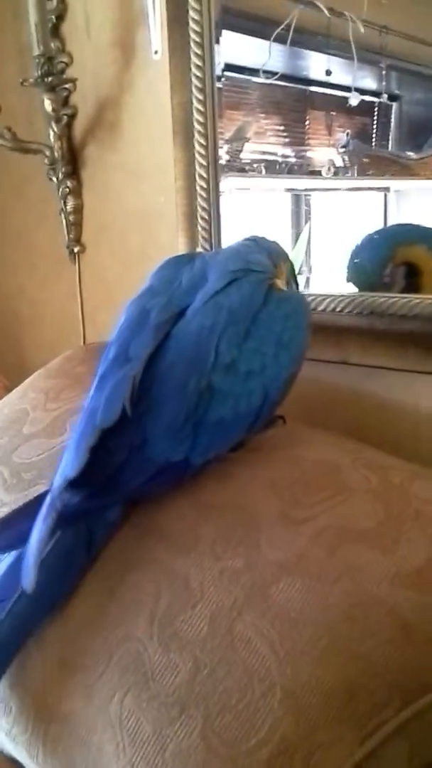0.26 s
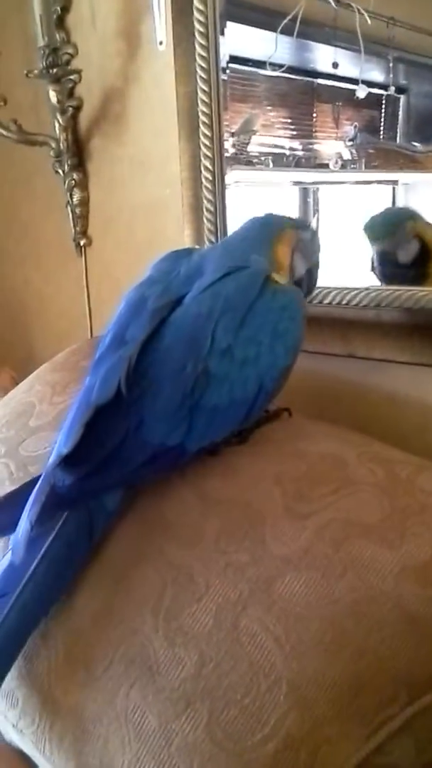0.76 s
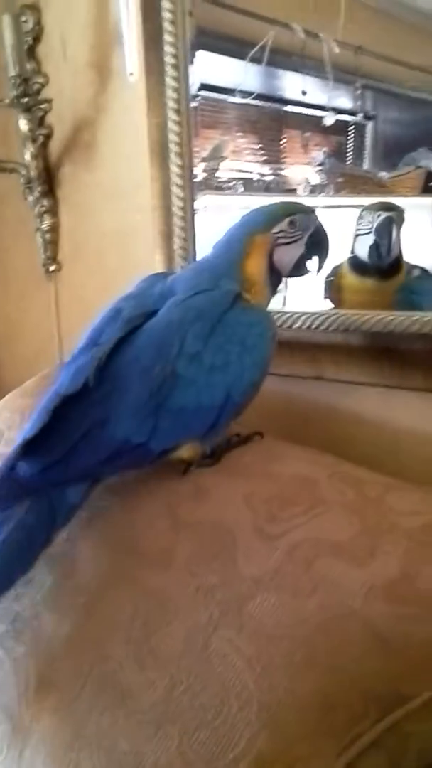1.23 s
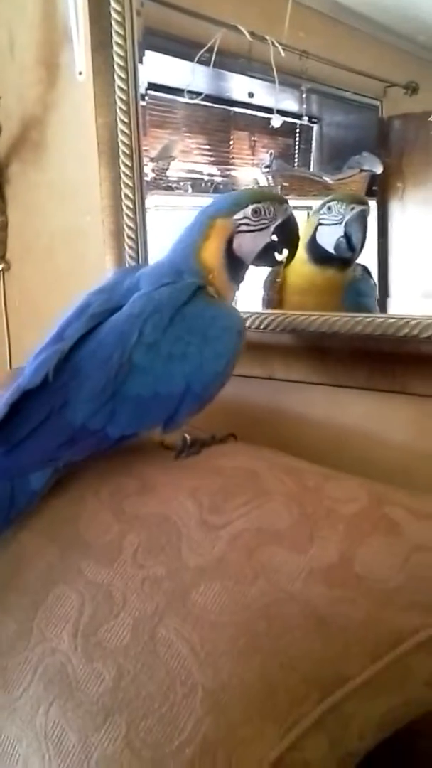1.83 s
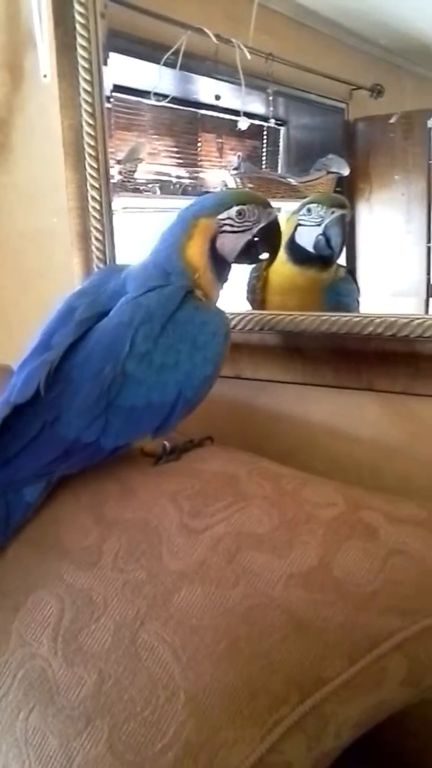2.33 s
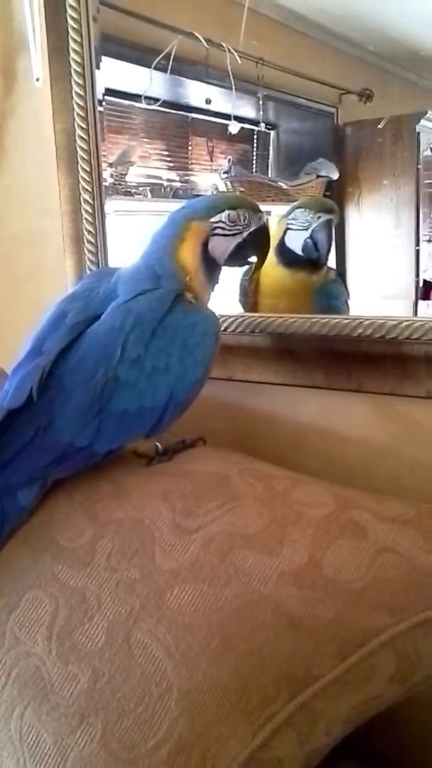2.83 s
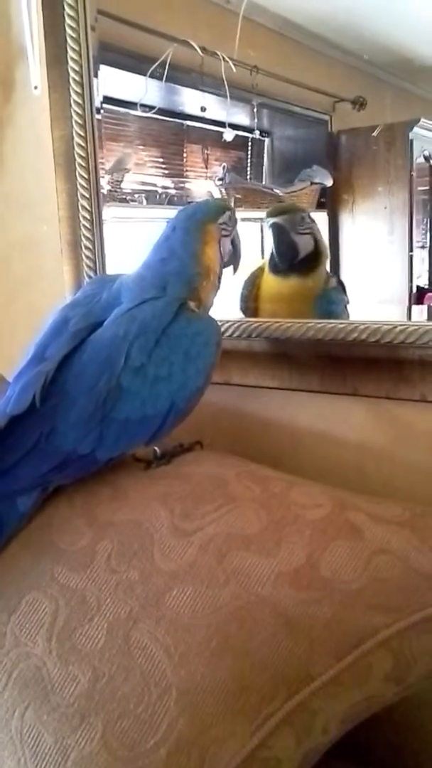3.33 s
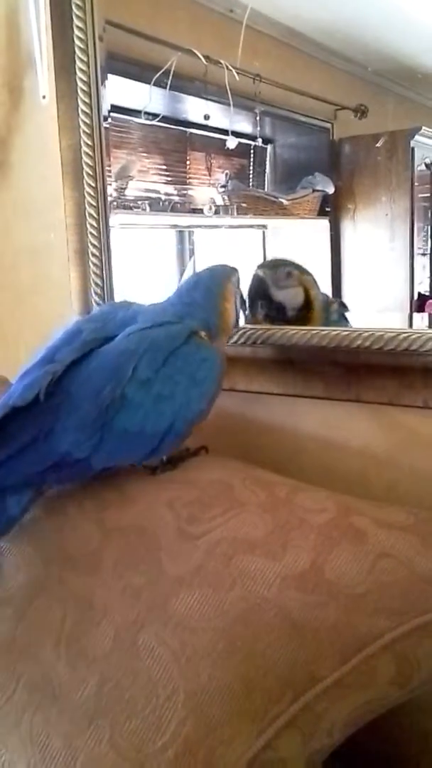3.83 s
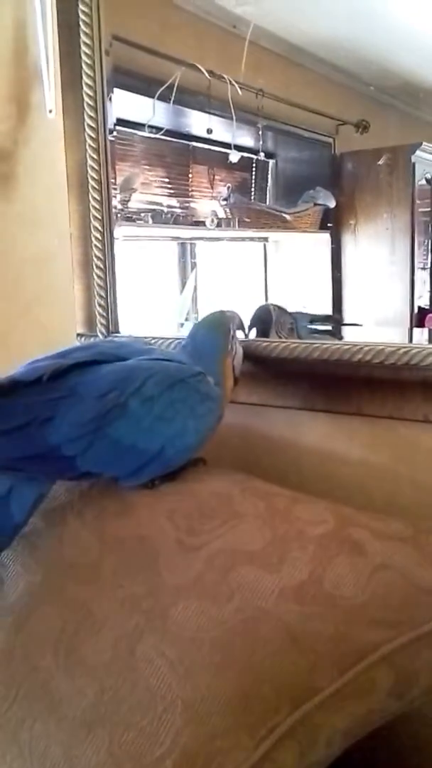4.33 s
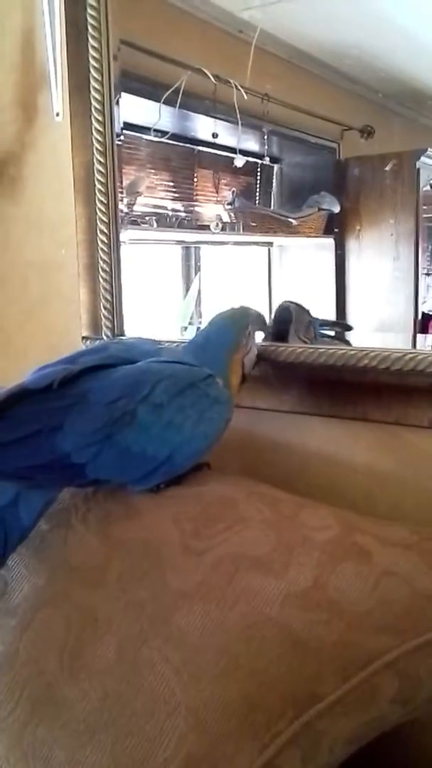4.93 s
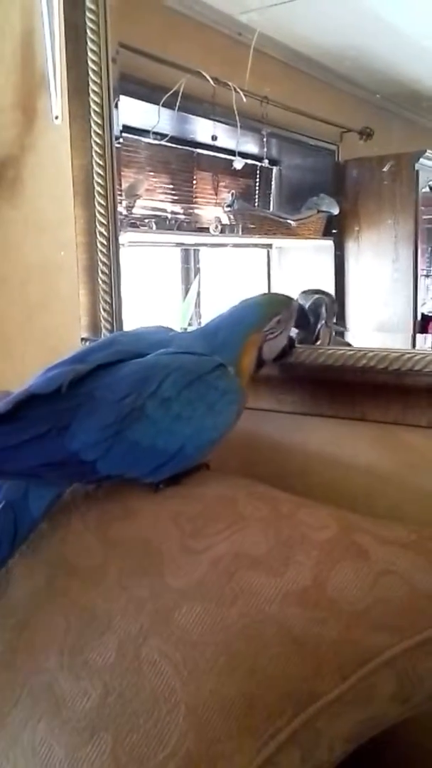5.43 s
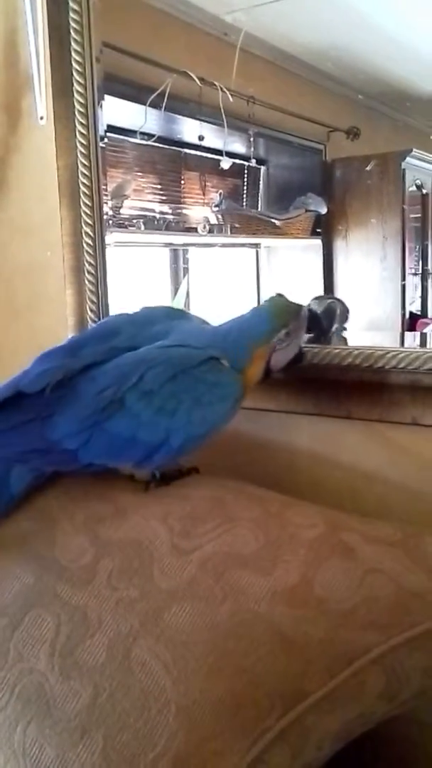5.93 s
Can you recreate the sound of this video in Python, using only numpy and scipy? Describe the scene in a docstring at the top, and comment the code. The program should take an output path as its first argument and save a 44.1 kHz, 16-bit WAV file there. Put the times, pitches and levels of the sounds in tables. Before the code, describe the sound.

Close thuds, tiny creaks and brief buzzes from a handled phone over faint hiss, followed by a parrot's irregular gritty beak taps on glass.

```python
"""Faint hum and hiss of a small room, a thin whistle at the start and faint rustling; then soft bumps,
creaks and deep dry knocks on a phone case, some followed by a buzz; later a macaw clicks and taps a mirror.
Knocks and bumps drive decaying sine modes; ticks, buzzes, creaks and taps are enveloped coloured noise;
grip rumble and rustle are resonant noise, the whistle is a gliding sine, the hum a sine plus narrow noise."""
import sys
import numpy as np
from scipy import signal
from scipy.fft import rfft, irfft
from scipy.io import wavfile
from scipy.ndimage import uniform_filter1d

SR = 44100
rng = np.random.default_rng(int(sys.argv[2]) if len(sys.argv) > 2 else 0)


def wav_out(sig):
    """Save sig, one row per channel (or a flat mono array), as 16-bit PCM at SR to the path in sys.argv[1]."""
    wavfile.write(sys.argv[1], SR, np.round(np.clip(np.atleast_2d(sig).T, -1, 1) * 32767).astype(np.int16))


N = 271656
T = np.arange(N) / SR

# colour of a dry contact on the case: (frequency [Hz], level [dB])
CONTACT_COLOUR = [(500, 13), (1800, 8.5), (2900, -3), (3800, 5.5), (5000, -0.5), (6500, -6), (9000, -3.5),
                  (12000, -15), (14500, -0.5)]


def undb(db):
    """Decibels to gain."""
    return 10 ** (np.asarray(db) / 20)


def unit(x):
    """Scale to rms 1."""
    return x / np.sqrt(np.mean(x ** 2))


def curve(rows):
    """Rows of (time [s], value) joined by straight lines."""
    return np.interp(T, *np.transpose(rows))


def add(track, start_s, sound):
    """Mix a sound into a track, cut at the track's end."""
    i = int(round(start_s * SR))
    track[..., i:i + sound.shape[-1]] += sound[..., :max(N - i, 0)]


def highpass(x, order, hz):
    """Butterworth high-pass."""
    return signal.sosfilt(signal.butter(order, hz, "high", fs=SR, output="sos"), x)


def noise(size, colour, tilt_db_per_oct=0, low_hz=1):
    """Noise of rms 1 with a (Hz, dB) colour, a tilt and a bass roll-off below low_hz."""
    hz = np.maximum(np.fft.rfftfreq(size, 1 / SR), 1)
    points_hz, points_db = np.transpose(colour)
    colour_db = np.interp(np.log(hz), np.log(points_hz), points_db)
    gain = undb(colour_db + tilt_db_per_oct * np.log2(hz))
    gain = gain / np.hypot(1, (low_hz / hz) ** 3)
    return unit(irfft(rfft(rng.standard_normal(size)) * gain, size))


def resonate(x, hz, width_hz):
    """A resonance with gain 1 at its centre."""
    return signal.lfilter(*signal.iirpeak(hz, hz / width_hz, fs=SR), x)


def band(size, hz, width_hz):
    """Noise of rms 1 through the same resonance twice."""
    once = resonate(rng.standard_normal(size), hz, width_hz)
    return unit(resonate(once, hz, width_hz))


def fade(t, t60_s):
    """Exponential decay, 60 dB in t60_s."""
    return np.exp(-np.log(1000) * t / t60_s)


def push(t, centre_ms, width_ms):
    """Gaussian pulse of unit sum; width_ms is its standard deviation."""
    force = np.exp(-.5 * ((t * 1000 - centre_ms) / width_ms) ** 2)
    return force / force.sum()


def walk(rate_hz):
    """Smoothed random steps of rms near 1."""
    k = int(SR / rate_hz)
    steps = np.repeat(rng.standard_normal(N // k + 1), k)
    return unit(uniform_filter1d(steps, k))[:N]


def swells(rows):
    """Power-summed bell gains from (middle [s], length at half height [s], level [dB])."""
    power = 0
    for middle_s, length_s, db in rows:
        bell = .5 ** ((2 * (T - middle_s) / length_s) ** 2)
        power = power + (undb(db) * bell) ** 2
    return np.sqrt(power)


def room():
    """Coloured air and microphone hiss, plus an appliance hum: a sine wavering against narrow noise."""
    # hiss level before each side's gain: (time [s], level [dB])
    hiss = [(0.0, -69), (0.38, -70.5), (1.18, -66), (1.99, -72.5), (2.86, -73.5), (4.13, -70), (4.56, -73),
            (5.8, -70), (6.16, -69)]
    # room air at each microphone: (frequency [Hz], level [dB])
    air_left = [(30, 33), (150, 14.5), (300, 12.5), (600, 12), (1500, 5.5), (3000, 2.5), (8000, 0.5),
                (14000, 0.5)]
    air_right = [(30, 5), (70, 19), (140, 18.5), (330, 16.5), (600, 11.5), (1500, 5.5), (3000, 3.5),
                 (8000, 1), (14000, -1)]
    air = np.array([undb(15) * noise(N, air_left), undb(11.5) * noise(N, air_right)])
    hum = undb(-73.5) * band(N, hz=245.1, width_hz=21.6)
    hum += undb(-62.0) * np.sin(2 * np.pi * 246 * T)
    return air * undb(curve(hiss)) + np.outer([undb(-21.0), 1], hum)


def whistle():
    """A thin, fluttering sine whose pitch rises as it swells."""
    # swells: (middle [s], length at half height [s], level [dB])
    whistle_swells = [(0.01, .07, -65), (.29, .15, -66), (.49, .08, -68)]
    rest_hz, rise_hz, flutter_hz = 5430, 370, 55
    level = swells(whistle_swells)
    hz = rest_hz + rise_hz * level / level.max() + flutter_hz * walk(120)
    tone = np.sin(2 * np.pi * np.cumsum(hz) / SR)
    return np.outer([undb(-18), 1], level * undb(4 * walk(40)) * tone)


def grip_rumble():
    """Skin creeps on the case beside the left microphone: low resonant noise, louder as the grip shifts."""
    # grip shifts: (middle [s], length at half height [s], level [dB])
    shifts = [(.585, 0.14, -40), (1.2, 0.97, -46), (3.7, 0.65, -57.5), (6.0, 0.53, -55.5)]
    rest_db = -56
    level = np.hypot(undb(rest_db), swells(shifts)) * undb(2.8 * walk(22))
    rumble = band(N, hz=82.5, width_hz=70) * level
    return np.array([rumble, undb(-29) * rumble])


def feathers():
    """Feathers brush as the bird moves: faint fluttering high noise, mostly on the right."""
    # rustles: (middle [s], length at half height [s], level [dB])
    rustles = [(.36, 0.49, -65), (1.0, 0.87, -67), (1.7, 0.33, -65), (3.47, .08, -67.5),
               (4.28, 0.41, -65.5), (5.0, 0.44, -68), (5.93, 0.55, -68)]
    rest_db = -75.5
    level = np.hypot(undb(rest_db), swells(rustles)) * undb(3.6 * walk(19))
    left, right = [undb(side_db) * band(N, hz=4340, width_hz=1500) for side_db in (-12, 0)]
    return np.array([left, right]) * level


def case_ring(t, hard_db):
    """Impulse response of the case as decaying sine modes; hard_db lifts or cuts the upper ones."""
    # modes: (frequency [Hz], level [dB], t60 [s], polarity [+1 or -1])
    modes = [(81, -12, 0.071, -1), (119.7, 1.1, 0.017, -1), (252.4, -16, 0.034, 1), (339, -24.5, .055, -1),
             (525, -34.5, 0.036, 1), (660, -10.5, 0.023, 1), (741, -24.5, 0.024, 1), (1030, -19, .019, 1),
             (1640, -33.5, 0.0074, 1), (2123, -25.5, 0.0072, -1), (2500, -42, 0.015, -1)]
    full_effect_hz = 1400
    ring = np.zeros(len(t))
    for hz, db, t60_s, polarity in modes:
        gain = polarity * undb(db + hard_db * min(hz / full_effect_hz, 1) ** 2)
        ring += gain * np.sin(2 * np.pi * hz * t) * fade(t, t60_s)
    return ring


def at_microphones(body):
    """Case motion at both microphones: the ports pass no deep bass, the right one hardly feels it."""
    left = highpass(body, order=2, hz=96)
    right = highpass(body, order=2, hz=900)
    return np.array([left, undb(-32) * right])


def finger_bumps():
    """Soft fingertips press and ease off; flesh shakes only the low modes of the case."""
    # bumps: (time [s], level [dB], first push's standard deviation [ms])
    bumps = [(0.124, -10, 0.7), (0.146, -16.5, 0.96), (0.353, -15.5, 0.51), (0.753, -14.5, 0.89),
             (.979, -9, 0.76), (1.046, -19, 1.1), (1.141, -21, 0.85), (1.23, -8.5, 0.85),
             (3.692, -21, 1.24), (6.068, -24.5, 0.42)]
    flesh_hz, lead_s = 480, .006
    t, body = T[:SR // 8], np.zeros(N)
    lowpass = signal.butter(6, flesh_hz, fs=SR, output="sos")
    ring = signal.sosfilt(lowpass, case_ring(t, hard_db=0))
    for s, db, width_ms in bumps:
        press = -push(t, centre_ms=4.7, width_ms=width_ms)
        release = undb(-6.5) * push(t, centre_ms=9.63, width_ms=1.2)
        add(body, s - lead_s, undb(db) * signal.fftconvolve(press + release, ring))
    return at_microphones(body)


def creaks():
    """Tiny dry creaks of the case: short decaying noise, mostly on the left."""
    # creaks: (time [s], level [dB], brightness [dB per octave])
    creak_rows = [(.653, -39, -9), (0.693, -32, 3.5), (0.706, -32.5, 4), (0.726, -29, 5), (0.732, -32, 4.5),
                  (2.623, -39, 0), (2.694, -44, -0.5)]
    t, out = T[:1024], np.zeros((2, N))
    for s, db, tilt in creak_rows:
        for side, side_db in enumerate([0, -18]):
            grit = noise(len(t), CONTACT_COLOUR, tilt, low_hz=596) * fade(t, t60_s=0.0068)
            add(out[side], s, undb(db + side_db) * grit)
    return out


def knocks():
    """A hard impulse and the wall's soft spring back ring the case, with a bright contact tick."""
    # knocks: (time [s], level [dB], rebound [dB], hardness [dB], contact tick [dB])
    knock_rows = [(1.2435, 1.7, 10, -8.5, -24), (1.3245, 2, 10.5, 4, -27.5), (1.5376, 1.5, 11.5, 5, -25),
                  (1.5532, -0.6, 11, 3.5, -25.5), (2.2827, -2, 14, 9, -24.5), (3.1227, -2, 12, 4.5, -30.5),
                  (3.8461, -0.7, 14, 7.5, -22), (4.144, 0.5, 11, 7.5, -23.5), (5.6775, -1, 11.5, 6, -25)]
    t, tick_t = T[:SR // 8], T[:1024]
    body, ticks = np.zeros(N), np.zeros((2, N))
    for s, db, rebound_db, hard_db, tick_db in knock_rows:
        rebound = undb(rebound_db) * push(t, centre_ms=5.58, width_ms=1.42)
        blow = (t == 0) - rebound
        add(body, s, undb(db) * signal.fftconvolve(blow, case_ring(t, hard_db)))
        for side, side_db in enumerate([0, -12]):
            tick = noise(len(tick_t), CONTACT_COLOUR, low_hz=1120) * fade(tick_t, t60_s=0.0089)
            add(ticks[side], s, undb(tick_db + side_db) * tick)
    return at_microphones(body) + ticks


def buzzes():
    """Brief bell-shaped bursts of noise around 4.4 kHz, mostly on the right, soon after some knocks."""
    # buzzes: (time [s], level [dB])
    buzz_rows = [(1.2486, -40), (1.3295, -40), (1.5475, -30), (1.561, -28.5), (1.565, -30.5), (2.290, -37),
                 (2.2965, -39)]
    # buzz colour: (frequency [Hz], level [dB])
    buzz_colour = [(1000, -35), (2600, -10), (3500, -3), (4400, 8.5), (5400, -8), (7000, -12), (9000, -47),
                   (14000, -36)]
    t, out = T[:1024], np.zeros((2, N))
    swell = push(t, centre_ms=1.1, width_ms=.65)
    for s, db in buzz_rows:
        for side, side_db in enumerate([-17, -1]):
            buzz = noise(len(t), buzz_colour) * swell / swell.max()
            add(out[side], s, undb(db + side_db) * buzz)
    return out


def tap(db, tilt, low_hz):
    """A short gritty clack and its room tail; a softer tap has a larger share of tail."""
    # beak colour: (frequency [Hz], level [dB])
    beak_colour = [(100, -14), (250, 15.5), (420, 10), (750, 7), (1200, -0.5), (1800, 1), (2300, -4),
                   (3000, -2), (3900, -3.5), (4900, -3.5), (5600, -16.5), (7000, -15.5), (9000, -26),
                   (15000, -35)]
    clack_t60_s, room_t60_s = 0.055, .25
    tail_db = -5 + 0.31 * (-40 - db)
    far_side_db, shadow_db_per_oct = -14, -3.1  # the left microphone faces away from the bird
    tail_tilt_db_per_oct = 0.4
    t = T[:SR // 2]
    # horn catches and slips: uneven clumps
    clumps = unit(uniform_filter1d(rng.standard_normal(len(t)), size=60))
    clack_level = unit(undb(4 * clumps)) * fade(t, clack_t60_s)
    tail_level = undb(tail_db) * unit(undb(1.8 * clumps)) * fade(t, room_t60_s)
    sides = []
    for side_tilt in (tilt + shadow_db_per_oct, tilt):
        clack = clack_level * noise(len(t), beak_colour, side_tilt, low_hz)
        tail = tail_level * noise(len(t), beak_colour, side_tilt + tail_tilt_db_per_oct, low_hz)
        sides.append(clack + tail)
    left, right = sides
    onset = 1 - fade(t, t60_s=0.001)
    return undb(db) * np.array([undb(far_side_db) * left, right]) * onset


def beak():
    """Distinct beak clicks and taps, plus faint nibbles at the mirror's frame at random times."""
    # taps: (time [s], level [dB], brightness [dB per octave], bass roll-off [Hz])
    beak_rows = [(3.8508, -29, -10, 3930), (3.87, -35.5, -11, 4200), (3.9481, -27.5, -0.8, 480),
                 (4.3783, -41.5, -2, 280), (4.987, -50, -0.5, 450), (5.0555, -39.5, -2, 457),
                 (5.082, -49, 2, 450), (5.2259, -41, 0.5, 445), (5.2369, -31.5, 1.5, 423),
                 (5.897, -46, -3.5, 870), (5.9546, -44, -7.5, 520), (5.987, -44.5, -4.5, 446),
                 (6.039, -40.5, -5, 504)]
    nibble_from_s, nibble_to_s, nibble_count = 4.85, 6.1, 5
    out = np.zeros((2, N))
    for s, db, tilt, low_hz in beak_rows:
        add(out, s, tap(db, tilt, low_hz))
    for s in rng.uniform(nibble_from_s, nibble_to_s, size=nibble_count):
        add(out, s, tap(db=-61, tilt=-1.5, low_hz=350))
    return out


def scene():
    """The room, the handled phone and the bird, summed as (left, right)."""
    background = room() + whistle() + grip_rumble() + feathers()
    case = finger_bumps() + creaks() + knocks() + buzzes()
    return background + case + beak()


def record(dry):
    """The phone clips at full scale, then cuts the deepest rumble and the top."""
    rumble_hz, top_hz = 18, 14500
    sound = highpass(np.clip(dry, -1, 1), order=1, hz=rumble_hz)
    return signal.sosfilt(signal.ellip(10, .2, 70, top_hz, fs=SR, output="sos"), sound)


dry = scene()
out = record(dry)
wav_out(out)
```